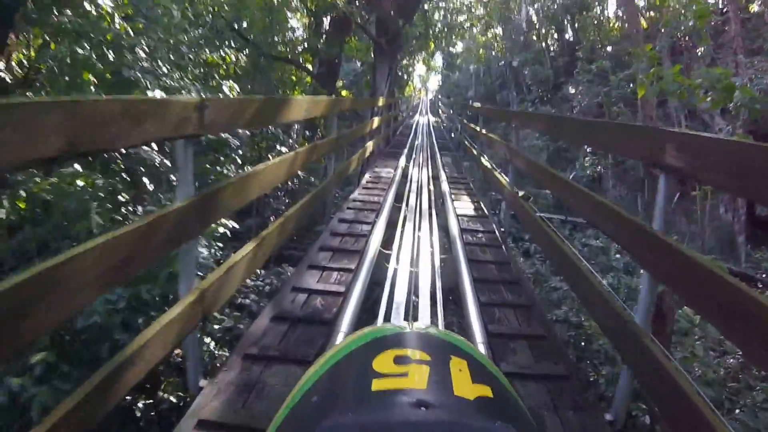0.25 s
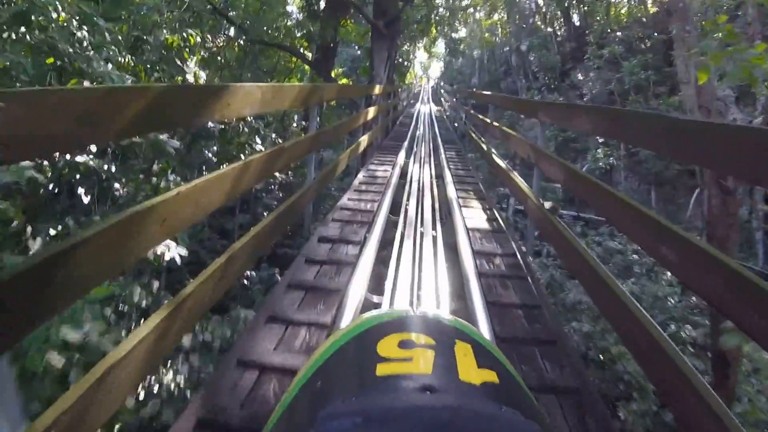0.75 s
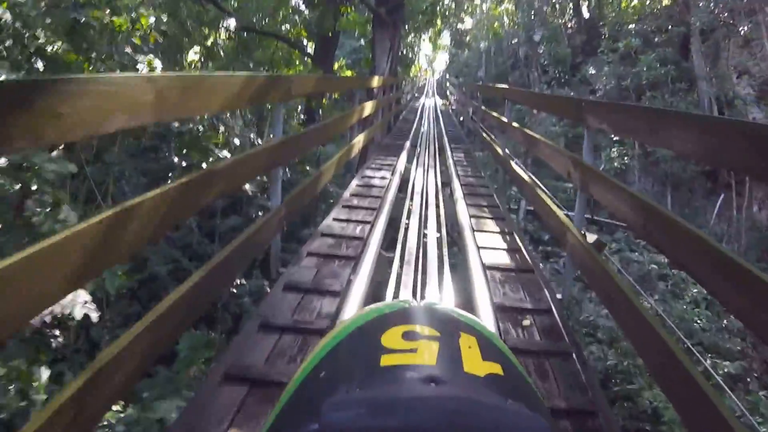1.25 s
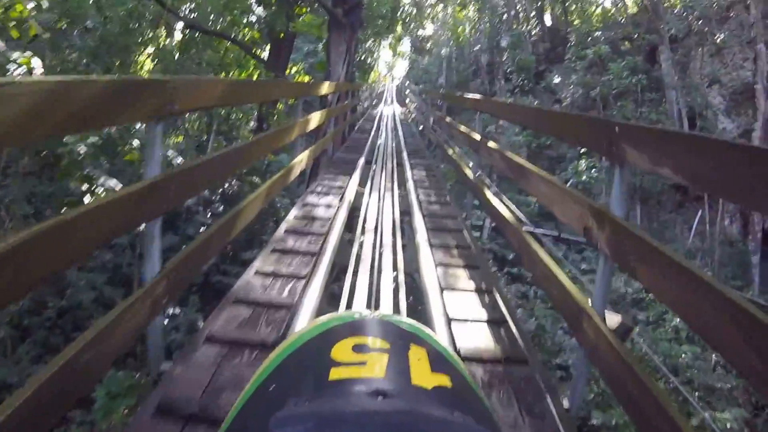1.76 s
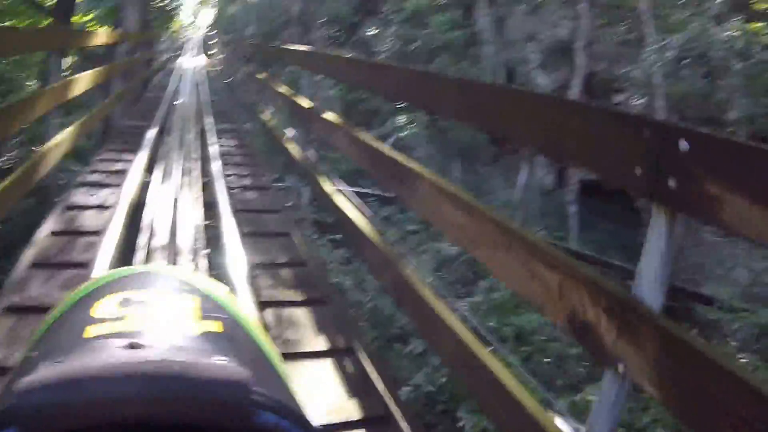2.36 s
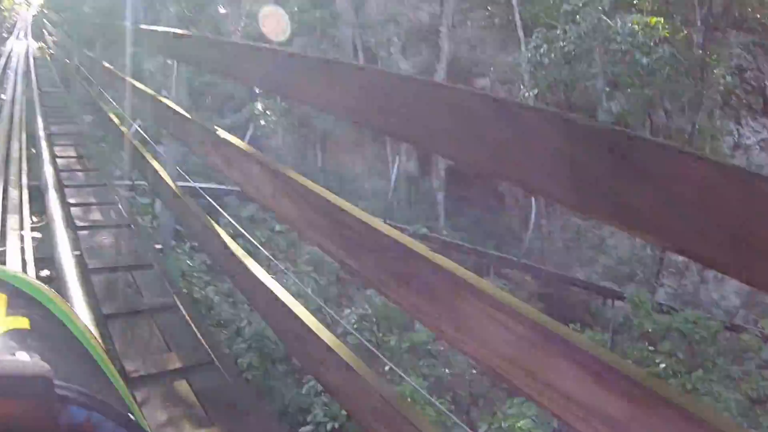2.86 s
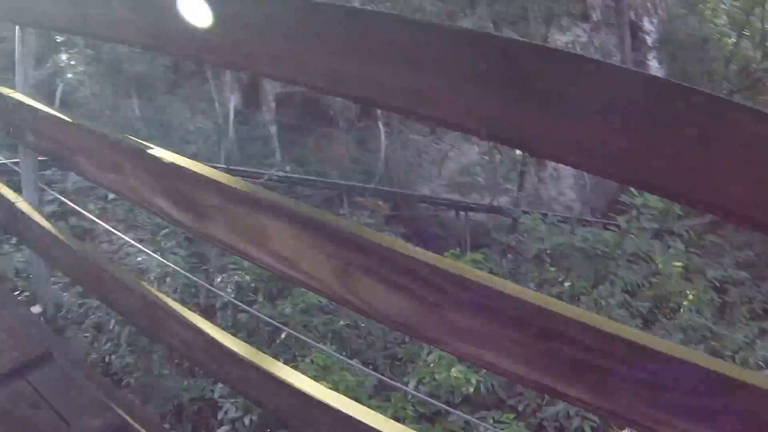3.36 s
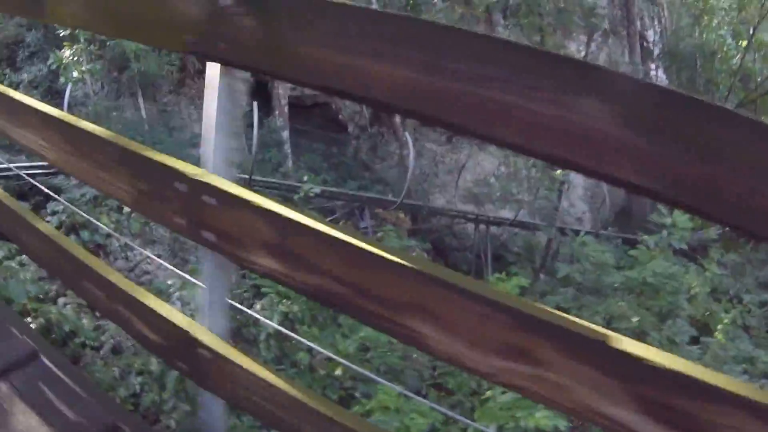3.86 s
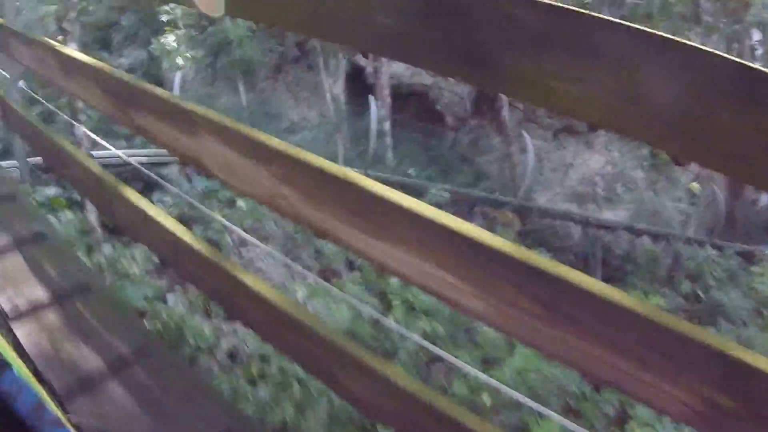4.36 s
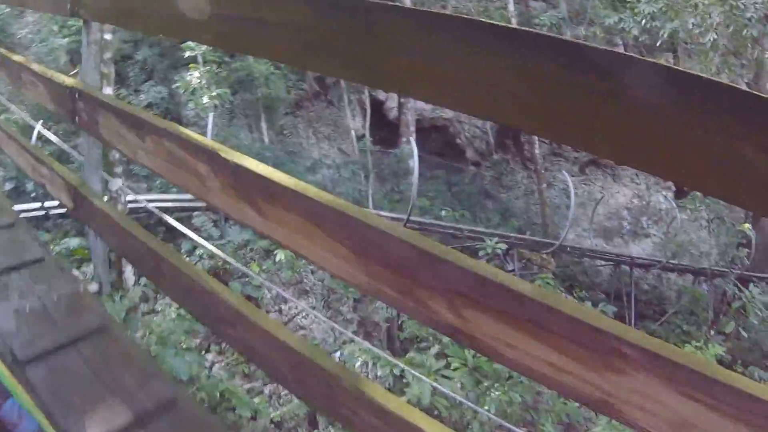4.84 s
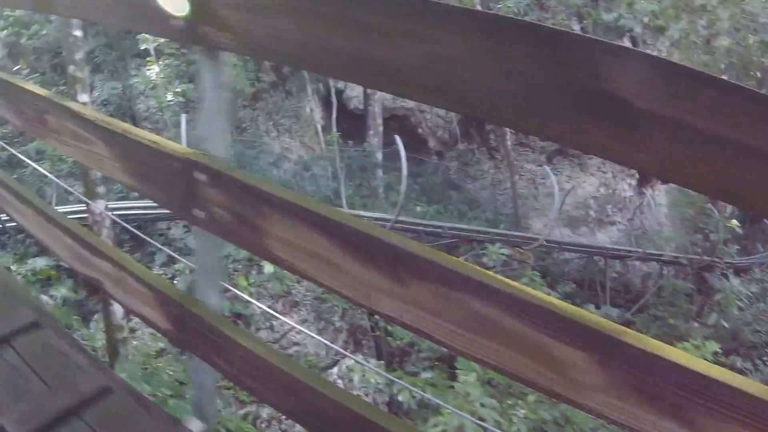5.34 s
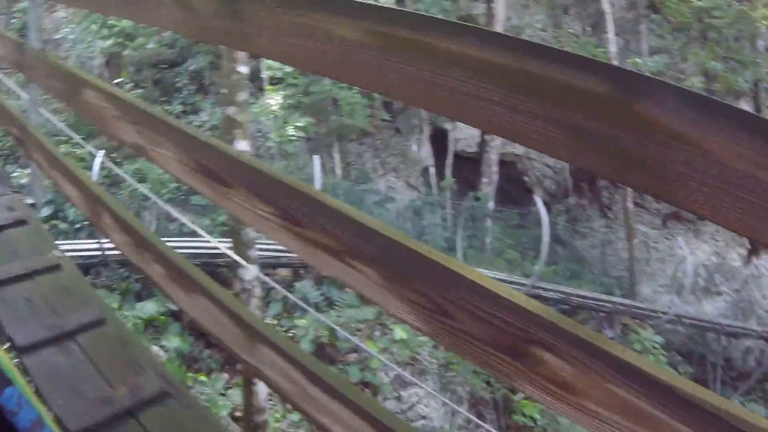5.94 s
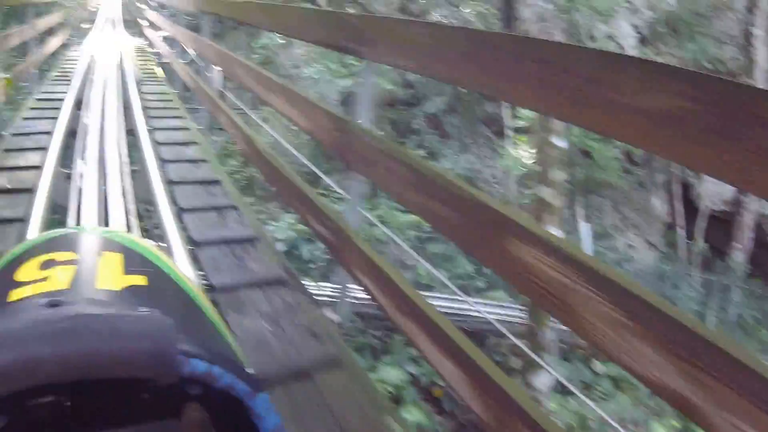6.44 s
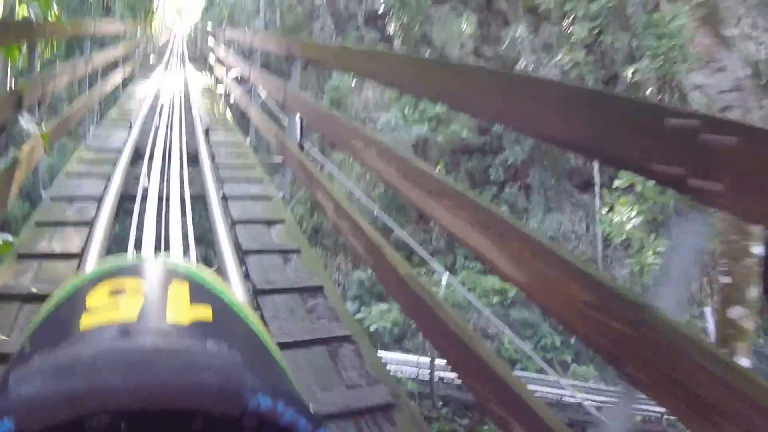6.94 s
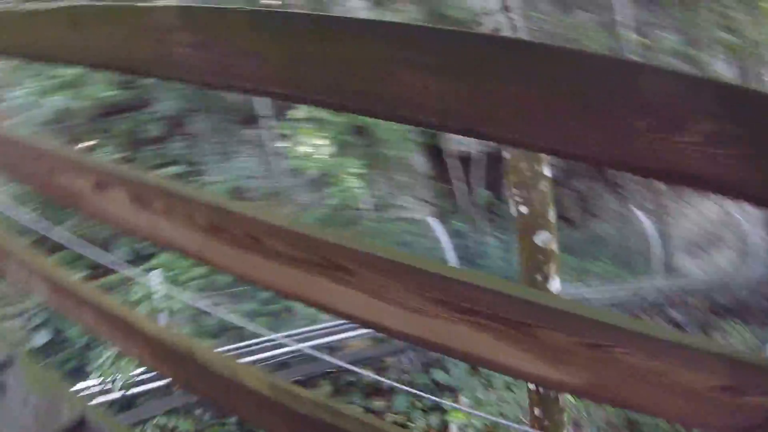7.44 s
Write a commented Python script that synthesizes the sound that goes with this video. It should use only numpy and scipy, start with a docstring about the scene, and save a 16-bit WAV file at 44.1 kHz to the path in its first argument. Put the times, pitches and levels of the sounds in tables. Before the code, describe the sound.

A steady low rumble and humming roll carry a ride cart along steel rails. Regular boomy double knocks mark the joints, answered by mostly weaker rear-wheel thuds, with bumps, rattles and small ticking metal parts between. Clangs grow sharper around the middle and later part, then ease. A high insect chorus swells and fades in the open forest. The single-channel onboard microphone sits close to the shaking shell, its extreme treble dulled.

```python
"""A ride cart is hauled along steel rails through a forest, heard from the seat.
About every three quarters of a second its front wheels knock twice over a joint: damped modes give the shell's
boom and the ringing steel, bursts of filtered noise the clatter. The rear wheels follow half a second later,
mostly softer. Bumps and clanks fall in between, over a rumble and rolling hum of filtered noise.
Around the track: insects as hissing noise and wavering tones, and one thin bird call as a gliding tone."""
import sys
import numpy as np
from scipy import signal
from scipy.fft import rfft, irfft
from scipy.io import wavfile
from scipy.ndimage import uniform_filter1d

SR = 44100
rng = np.random.default_rng(int(sys.argv[2]) if len(sys.argv) > 2 else 0)


def bounce(signal):
    """Save signal as a 16-bit WAV file at the path given by the first command-line argument."""
    frames = np.transpose(np.atleast_2d(signal))
    limited = np.clip(frames, -1, 1)
    pcm = np.round(limited * 32767).astype(np.int16)
    wavfile.write(sys.argv[1], SR, pcm)


N = 339570
TIME = np.arange(N) / SR
AGE = TIME[:SR]  # seconds since a blow; each blow lasts one second

# Rail joints under the cart. Each row: front axle's time in seconds, shell boom level in dB,
# steel clang level in dB, contact grit level in dB, nominal pitch of the struck part in Hz,
# rear axle thump level in dB, rear axle clang level in dB.
JOINTS = [(0.134, -17, -56.5, -67, 1390, -52, -70), (0.888, -13, -40, -49, 1720, -28.5, -62),
          (1.634, -16.5, -32.5, -41, 1986, -20, -34.5), (2.407, -16.5, -34, -53.5, 1595, -33.5, -61),
          (3.165, -15.5, -28.5, -39.5, 2130, -25, -44.5), (3.938, -14.5, -38.5, -51, 1420, -26.5, -58),
          (4.684, -15, -25, -42.5, 2044, -17.5, -37.5), (5.446, -16.5, -19.5, -38, 1600, -21, -19),
          (6.226, -15.5, -29, -43.5, 2006, -16.5, -48), (6.985, -15.5, -38.5, -56, 1800, -35, -51)]
USUAL_CLANG_DB = -34.5  # reference joint; a sharper edge shifts the other parts of the blow by their slopes


def undb(db):
    """Decibels to gain."""
    return 10 ** (np.asarray(db) / 20)


def unit(x):
    """Scale to rms 1."""
    return x / np.sqrt(np.mean(x ** 2))


def fade(t60):
    """Exponential decay, 60 dB in t60 seconds, that also closes smoothly after one second."""
    decay = np.exp(-np.log(1000) * AGE / t60)
    return decay * np.cos(np.pi / 2 * AGE ** 2)


def press(rise_s):
    """The contact force builds up over a few milliseconds or less."""
    return 1 - np.exp(-(AGE / rise_s) ** 2)


def add(track, s, sound):
    """Mix a sound into a track (or a stack of tracks) at a time."""
    start = min(max(int(s * SR), 0), N)
    track[..., start:start + sound.shape[-1]] += sound[..., :N - start]


def walk(rate):
    """Smooth random wander with spread 1, about `rate` fresh values a second."""
    hold = int(SR / rate)
    steps = np.repeat(rng.standard_normal(N // hold + 1), hold)
    return unit(uniform_filter1d(steps, hold)[:N])


def colour(x, points, peaks=(), size=8192):
    """Causal minimum-phase filter of unit power: a broad response with resonances on top."""
    f = np.maximum(np.fft.rfftfreq(size, 1 / SR), 1)
    hz, db = np.transpose(points)
    db = np.interp(np.log(f), np.log(hz), db)
    for centre_hz, width_hz, peak_db in peaks:
        db = db + peak_db / (1 + (2 * (f - centre_hz) / width_hz) ** 2)
    # keeping one side of the cepstrum makes the response start at once
    cepstrum = irfft(np.log(undb(db)))[:size // 2]
    response = irfft(np.exp(2 * rfft(cepstrum, size)))
    return signal.fftconvolve(x, response / np.linalg.norm(response))[:N]


def ring(modes, detune, rise_s):
    """Damped modes, slightly retuned by each blow."""
    waves = np.zeros(SR)
    for hz, t60, db, sign in modes:
        struck_hz = hz * (1 + detune * rng.standard_normal())
        waves += sign * undb(db) * fade(min(t60, 1.3)) * np.sin(2 * np.pi * struck_hz * AGE)
    return press(rise_s) * waves


def rattle(t60, rise_s, tail_db, tail_t60, grain_db, size=60):
    """A burst of tiny uneven contacts, with a quieter tail as the structure settles."""
    grain_levels = grain_db * np.clip(rng.standard_normal(SR // size + 1), -2, 2)
    grains = unit(np.repeat(undb(grain_levels), size)[:SR])  # each grain lasts `size` samples
    decay = fade(t60) + undb(tail_db) * fade(tail_t60)
    return rng.standard_normal(SR) * grains * press(rise_s) * decay


def forest():
    """An even hiss of distant insects, a chorus that swells and recedes, and nearer whines that sag."""
    # Hiss of the distant insects. Each row: frequency in Hz, relative level in dB.
    hiss_response = [(1500, -15.5), (2150, -2), (2700, -6.5), (3500, -7.5), (4150, -2.5), (4700, -0.5),
                     (5400, -4.5), (6200, -4.5), (7000, -8.5), (8500, -10.5), (10000, -18), (13000, -24),
                     (14500, -30.5)]
    # Narrow bands in that hiss. Each row: frequency in Hz, width in Hz, height in dB.
    hiss_peaks = [(2135, 57, 8), (2570, 60, 3), (3890, 35, 10.5), (4495, 38, 4), (5350, 77, 8)]
    # Colour of the insect chorus. Each row: frequency in Hz, relative level in dB.
    chorus_response = [(3500, -38), (4300, -12.5), (4700, -7.5), (5450, -7.5), (5900, 2.5), (6100, -1.5),
                       (6450, -17.5), (7500, -13.5), (9000, -34.5), (12000, -46.5)]
    # Calls of nearer insects. Each row: start in seconds, length in seconds, mean pitch in Hz, starting level in dB.
    insect_calls = [(0, 2.8, 6450, -72.5), (1.365, 0.82, 6100, -66), (6.204, 1.5, 6180, -75)]
    far_db, near_db, peak_s, width_s = -81.5, -59.5, 4.51, 1.83  # the chorus swells and recedes
    edge_s, sag_db_per_s = 0.017, 6

    hiss = undb(-63.0 + .5 * walk(18)) * colour(rng.standard_normal(N), hiss_response, hiss_peaks)
    swell = undb(far_db) + undb(near_db) * np.exp(-np.abs((TIME - peak_s) / width_s) ** 3)
    chorus = swell * undb(2.0 * walk(45)) * colour(rng.standard_normal(N), chorus_response)
    whine = np.zeros(N)
    for s, length_s, hz, db in insect_calls:
        age = np.clip(TIME - s, 0, length_s)
        gate = np.clip(np.minimum(age, length_s - age) / edge_s, 0, 1)
        level = undb(db - sag_db_per_s * age + 2 * walk(25))
        phase = 2 * np.pi * np.cumsum(hz + 75 * walk(700)) / SR
        whine += gate * level * np.sin(phase)
    return hiss + chorus + whine


def bird():
    """A thin whistle that rises and drops, smeared by the trees."""
    # The call, joined by straight lines. Each row: time in seconds, pitch in Hz before wavering, level in dB.
    whistle = [(2.77, 8600, -90), (2.795, 8400, -68), (2.828, 9640, -71), (2.838, 9300, -63),
               (2.846, 7530, -57), (2.868, 6930, -59), (2.9, 7040, -76), (2.94, 7100, -72),
               (2.97, 7160, -88)]
    s, pitch_hz, level_db = np.transpose(whistle)
    hz, db = np.interp(TIME, s, pitch_hz), np.interp(TIME, s, level_db)
    calling = (TIME > s[0]) & (TIME < s[-1])
    phase = 2 * np.pi * np.cumsum(hz + 130 * walk(600)) / SR
    call = calling * undb(db) * np.sin(phase)
    trees = rng.standard_normal(SR) * fade(0.69)
    return call + undb(0.5) * signal.fftconvolve(call, trees / np.linalg.norm(trees))[:N]


def rolling():
    """Rough wheels keep the shell humming over a deep unsteady rumble; now and then the cart lurches."""
    # Deep rumble. Each row: frequency in Hz, relative level in dB.
    rumble_response = [(8, -16), (20, 3.5), (35, -1), (50, -2), (80, 1), (110, -15), (200, -33),
                       (1000, -79.5)]
    # Hum of the rolling wheels through the shell. Each row: frequency in Hz, relative level in dB.
    hum_response = [(12, -33.5), (20, -11), (54, -2.5), (97, -5), (146, 3), (215, 0.5), (256, -4),
                    (318, -7.5), (403, -15), (501, -12.5), (649, -14.5), (755, -17.5), (1140, -22.5),
                    (2130, -28), (3500, -37), (4550, -61), (7700, -120)]
    # Resonances in that hum. Each row: frequency in Hz, width in Hz, height in dB.
    hum_peaks = [(114.6, 27, 5), (152.4, 15, 7), (334, 27, 10.5), (380, 33, 7), (515, 16, 14),
                 (762, 41, 8.5)]
    # The cart rocks on its mounts. Each row: time in seconds, level in dB.
    lurches = [(0.344, -22), (1.315, -19.5), (2.40, -24), (4.998, -23), (5.16, -20.5)]
    rumble_db, fall_db_per_s = -43, 0.26  # the rumble eases along the track

    sway_db = 3.3 * walk(12)
    rumble = colour(rng.standard_normal(N), rumble_response)
    rumble = rumble * undb(rumble_db - fall_db_per_s * TIME + sway_db)
    for s, db in lurches:
        rocking = ring([(46, 0.14, 0, 1), (71, 0.062, 0.94, 0.86)], detune=0.07, rise_s=0.008)
        add(rumble, s, undb(db) * rocking)
    roughness_db = 1.8 * walk(30)
    tread = rng.standard_normal(N) * undb(-43.5 + roughness_db)
    return rumble + colour(tread, hum_response, hum_peaks)


def rail():
    """The rail sings on after every other joint; its close modes beat as they die away."""
    rail_hz, rail_t60_s, rail_db = 1990, 1, -49.5  # level at the reference joint
    slope = 1.1  # rise of the ring with the clang, dB per dB
    out = np.zeros(N)
    cluster = [(rail_hz + offset_hz, rail_t60_s, db, sign)
               for offset_hz, db, sign in [(0, -1, 0.63), (37.3, -4, -1), (78.3, -5, 0.72)]]
    for s, _, clang_db, *_ in JOINTS[::2]:
        level = undb(rail_db + slope * (clang_db - USUAL_CLANG_DB))
        add(out, s, level * ring(cluster, detune=0.0013, rise_s=.004))
    return out


def steel_ring(scatter_db):
    """Each blow lands elsewhere on the steel and wakes its modes in a different mix."""
    # Modes of the steel frame and rail. Each row: frequency in Hz, 60 dB decay in seconds,
    # typical level in dB.
    steel_modes = [(785, 0.95, 0.5), (954, 0.52, 0), (1074, 0.44, -6.5), (1170, 0.35, -4), (1235, 0.5, -5),
                   (1370, 0.46, -13), (1670, 0.39, -8), (1800, 0.2, -1), (1930, 0.22, -4), (2045, 0.4, -10),
                   (2190, 0.3, -8), (2310, 0.73, -8.5), (2460, 0.32, -2.5), (2663, 0.44, -11),
                   (3020, 0.13, -6.5), (3160, 0.16, 1.5), (3960, 0.3, -17), (5630, 0.23, -22)]
    chance = rng.standard_normal((len(steel_modes), 2))
    modes = [(hz, t60, db + scatter_db * a, np.sign(b))
             for (hz, t60, db), (a, b) in zip(steel_modes, chance)]
    return ring(modes, detune=0.0022, rise_s=0.01)


def clink(hz, t60):
    """The small part that is struck rings briefly on its own pitch and two weaker neighbours."""
    modes = [(hz, t60, 0, 1), (.84 * hz, t60, -5, -1), (1.22 * hz, t60, -6, -1)]
    return ring(modes, detune=0.0031, rise_s=0.0004)


def bump(thump_db, clatter_db, t60):
    """The wheel carriage thumps, shaking chassis and a little steel: (tones, clatter, clang, grit)."""
    # Modes of the wheel carriage. Each row: frequency in Hz, 60 dB decay in seconds,
    # relative level in dB, signed amplitude factor.
    carriage_modes = [(125, 0.6, -7, -0.42), (149.5, 0.27, 0, 0.76), (180, 0.08, 1, -0.96),
                      (231, 0.24, -11, 1), (312.5, 0.14, -2, -0.78), (409, 0.29, -27.5, 0.38),
                      (490.5, 0.1, -14, -1), (670, .12, -28.5, 1)]
    thump = ring(carriage_modes, detune=0.034, rise_s=0.00029)
    clatter = rattle(t60, rise_s=0.00068, tail_db=-19.5, tail_t60=0.57, grain_db=1.5)
    clang = rattle(t60, rise_s=0.0076, tail_db=-11.5, tail_t60=0.16, grain_db=2.5)
    return np.array([undb(thump_db - 5.0) * thump,
                     undb(clatter_db - 2.5) * clatter,
                     undb(clatter_db - 23) * clang,
                     np.zeros(SR)])


def clank(db, grit_db, part_hz, t60):
    """Steel strikes steel; the part and its bracket ring: (tones, clatter, clang, grit)."""
    part = undb(-6.5) * clink(part_hz, t60=0.055)
    bracket = undb(-6.5) * clink(690.0, t60=0.15)
    tones = undb(-26) * steel_ring(scatter_db=6.5) + part + bracket
    clatter = rattle(t60, rise_s=.005, tail_db=-6.5, tail_t60=1.0, grain_db=12)
    clang = rattle(t60, rise_s=0.00087, tail_db=-11.5, tail_t60=1.0, grain_db=7)
    grit = rattle(t60, rise_s=0.0011, tail_db=-18.5, tail_t60=0.54, grain_db=1.0)
    return np.array([undb(db) * tones,
                     undb(db - 13.5) * clatter,
                     undb(db - 8.0) * clang,
                     undb(grit_db) * grit])


def uneven_track(count=10):
    """Stronger bumps at set times, and faint jolts at random moments."""
    # The stronger bumps. Each row: time in seconds, thump level in dB, clatter level in dB,
    # both before the carriage's own trims.
    bumps = [(0.124, -19.5, -30.5), (0.422, -27.5, -55), (0.771, -23.5, -37.5), (0.819, -17.5, -28),
             (0.871, -16, -33), (1.098, -22.5, -33), (1.775, -21.5, -26), (2.356, -17.5, -31.5),
             (2.757, -18, -29), (2.95, -20.5, -26), (3.342, -23.5, -48), (3.534, -24.5, -31.5),
             (3.812, -29, -30.5), (4.406, -23.5, -34), (4.744, -15, -37), (4.887, -18, -28),
             (5.287, -22.5, -30.5), (5.746, -25.5, -34), (6.052, -20.5, -30), (6.335, -20, -32),
             (6.902, -22.5, -37.5), (7.21, -19, -23), (7.509, -18, -27)]
    jolt_thump_db, jolt_clatter_db = -35, -52  # the strongest jolt
    parts = np.zeros((4, N))
    for s, thump_db, clatter_db in bumps:
        add(parts, s, bump(thump_db, clatter_db, t60=0.091))
    for k, (when, strength) in enumerate(rng.random((count, 2))):
        db = 10 * np.log10(.5 + .5 * strength)
        s = (k + when) / count * N / SR
        add(parts, s, bump(jolt_thump_db + db, jolt_clatter_db + db, t60=0.04))
    return parts


def fittings():
    """Loose fittings strike and bounce once."""
    # Loose steel fittings. Each row: time in seconds, clang level in dB, contact grit level in dB,
    # nominal pitch of the fitting in Hz.
    clanks = [(1.3123, -37.5, -56, 1450), (1.3354, -40, -42.5, 1820), (1.7853, -29.5, -48, 2264),
              (2.2393, -37, -64, 1950), (2.356, -48, -57, 1890), (2.5676, -42, -67, 1930),
              (4.8284, -28, -48, 2330), (4.889, -33, -52, 2040), (4.9542, -35.5, -65, 1764),
              (5.3542, -38, -59, 2020), (5.5969, -26, -41, 1905), (5.6207, -27.5, -43, 1980),
              (5.6641, -32, -58, 2010), (6.1262, -36.5, -72, 1770)]
    bounce_s, bounce_db = .024, -14  # second strike, against the first
    parts = np.zeros((4, N))
    for s, db, grit_db, part_hz in clanks:
        add(parts, s, clank(db, grit_db, part_hz, t60=0.063))
        add(parts, s + bounce_s, undb(bounce_db) * clank(db, grit_db, part_hz, t60=0.037))
    return parts


def chatter(count=7):
    """After each joint a few small steel parts tick at random, tending fainter with time."""
    start_s, span_s = 0.083, .24
    level_db, fall_db_per_s = -18, 31.5  # level against the joint's clang
    parts = np.zeros((4, N))
    for s, _, clang_db, _, part_hz, *_ in JOINTS:
        for k, (when, size) in enumerate(rng.random((count, 2))):
            age = start_s + span_s * (k + when) / count
            db = clang_db + level_db - fall_db_per_s * age
            tick_hz = part_hz * 2 ** (.5 - size) / 1.2  # a larger part ticks lower
            tick = rattle(t60=0.055, rise_s=0.0013, tail_db=-22, tail_t60=0.2, grain_db=8.5)
            add(parts[0], s + age, undb(db) * clink(tick_hz, t60=0.063))
            add(parts[2], s + age, undb(db) * tick)
    return parts


def rear_axle(part_hz=1820):
    """The rear pair of wheels meets the same joint, farther from the seat."""
    axle_s, wheel_gap_s = .481, .026  # delay behind the front axle, then between the rear wheels
    grit_db = -22.5  # against the clang
    parts = np.zeros((4, N))
    for s, *_, thump_db, clang_db in JOINTS:
        thump = bump(thump_db, thump_db - 12, t60=0.12)
        steel = clank(clang_db, clang_db + grit_db, part_hz, t60=0.15)
        add(parts, s + axle_s, thump + steel)
        add(parts, s + axle_s + wheel_gap_s, bump(thump_db - 1.0, thump_db - 15.5, t60=0.29))
    return parts


def wheel_blow(shell, clatter_db, clang_db, grit_db):
    """One front wheel drops over a joint: (tones, clatter, clang, grit)."""
    clatter = rattle(t60=0.12, rise_s=0.0038, tail_db=-24.5, tail_t60=0.98, grain_db=-1.5)
    clang = rattle(t60=0.1, rise_s=0.0056, tail_db=-23.5, tail_t60=1.0, grain_db=5.5)
    grit = rattle(t60=0.15, rise_s=0.0011, tail_db=-21.5, tail_t60=1.0, grain_db=2)
    return np.array([shell,
                     undb(clatter_db) * clatter,
                     undb(clang_db + 3.0) * clang,
                     undb(grit_db) * grit])


def front_axle():
    """Leading wheel, trailing wheel, then a soft rebound at every joint."""
    # Modes of the cart's shell. Each row: frequency in Hz, 60 dB decay in seconds,
    # relative level in dB, signed amplitude factor.
    shell_modes = [(120.7, 0.88, -8, 0.31), (148.5, 0.28, 0.5, 0.45), (203, 0.14, 4, -0.84),
                   (270.3, 0.19, -14, -0.87), (329.2, 0.16, -17, 0.98)]
    wheel_gap_s, rebound_s = .022, .06  # after the leading wheel
    parts = np.zeros((4, N))
    for s, boom_db, clang_db, grit_db, part_hz, *_ in JOINTS:
        sharp_db = clang_db - USUAL_CLANG_DB
        clatter_db = -24 + 0.31 * sharp_db
        shell = undb(boom_db) * ring(shell_modes, detune=0.0046, rise_s=0.0022)
        steel = undb(clang_db - 21.5) * steel_ring(scatter_db=7.5)
        part = undb(clang_db - 3.5) * clink(part_hz, t60=0.07)
        add(parts[0], s, steel + part)
        # on a worn joint, where the clang is soft, the trailing wheel scrapes as much as the leading one
        trailing = (wheel_gap_s, 3.5 + 0.16 * sharp_db, 0, -3 - 0.32 * sharp_db)
        # each blow: delay in seconds, then boom, clatter and edge in dB against the leading wheel
        blows = [(0, 0, 0, 0), trailing, (rebound_s, -14.5, -14, -20)]
        for delay, push_db, shake_db, edge_db in blows:
            blow = wheel_blow(undb(push_db) * shell, clatter_db + shake_db,
                              clang_db + edge_db, grit_db + edge_db)
            add(parts, s + delay, blow)
    return parts


def knocks():
    """Joints, bumps and loose fittings all shake the same shell, chassis and steel."""
    # Broad responses of the chassis, the steel and the gritty contact.
    # Each row: frequency in Hz, relative level in dB.
    chassis_response, steel_response, grit_response = [(120, -30), (260, 1), (400, 1.5), (700, -6),
                                                       (950, -9), (1300, -21), (2500, -35), (8000, -62.5)], [(300, -34.5), (750, 4.5),
                                                                        (1100, 0.5), (1450, -3),
                                                                        (2100, -4.5), (2700, -8.5),
                                                                        (3200, -20), (3550, -25.5),
                                                                        (6000, -51), (12000, -86)], [(1500, -59),
                                                                                       (3000, 9.5),
                                                                                       (3500, 4),
                                                                                       (4000, 7.5),
                                                                                       (5500, 5.5),
                                                                                       (6300, -7.5),
                                                                                       (7200, -16.5),
                                                                                       (10000, -32),
                                                                                       (14000, -47)]
    # Resonances of the chassis and of its steel parts. Each row: frequency in Hz, width in Hz,
    # height above the broad response in dB.
    chassis_peaks, steel_peaks = [(418, 38, 4), (491, 71, 6.5), (605.4, 117, 7), (706.5, 40, 8),
                                  (852, 22, 7)], [(1150, 340, 5.3), (1662, 9.7, 9.5),
                                                         (2060, 170, 1.6), (3020, 180, 6.8)]
    tones, clatter, clang, grit = uneven_track() + fittings() + chatter() + rear_axle() + front_axle()
    chassis = colour(clatter, chassis_response, chassis_peaks)
    steel = colour(clang, steel_response, steel_peaks)
    return tones + chassis + steel + colour(grit, grit_response)


def scene():
    """The forest and the cart running through it, in one channel."""
    return (forest() + bird() + rolling() + rail() + knocks())[None]


def record(dry):
    """The camera's microphone channel cuts the top of the treble with a steep low-pass at 14.4 kHz."""
    low_pass = signal.ellip(8, .2, 70, 14400, fs=SR, output="sos")
    return signal.sosfilt(low_pass, dry)


dry = scene()
out = record(dry)
bounce(out)
```